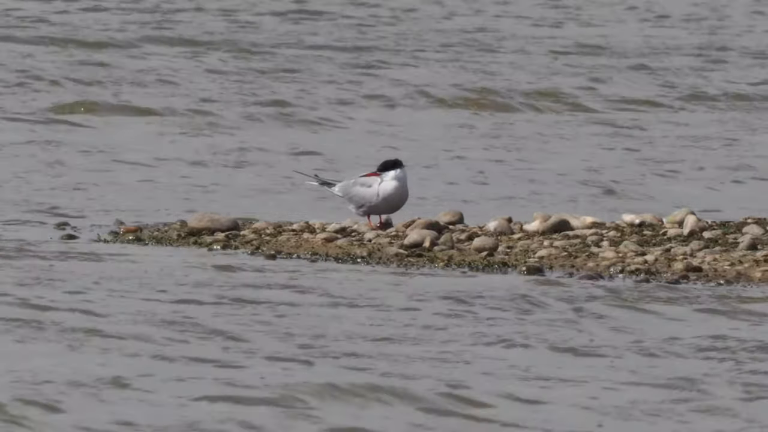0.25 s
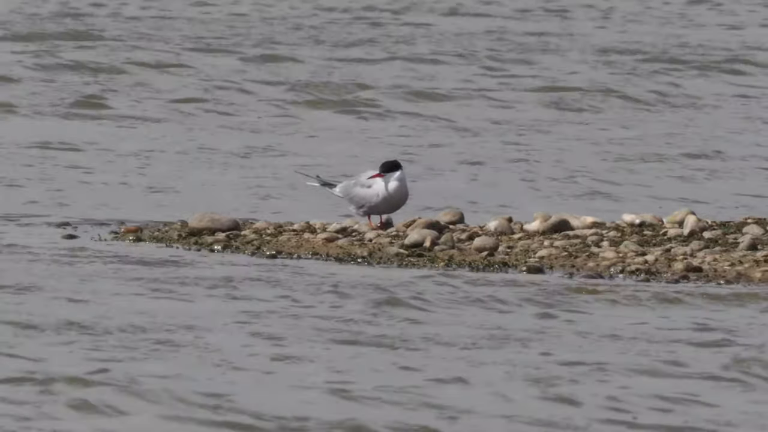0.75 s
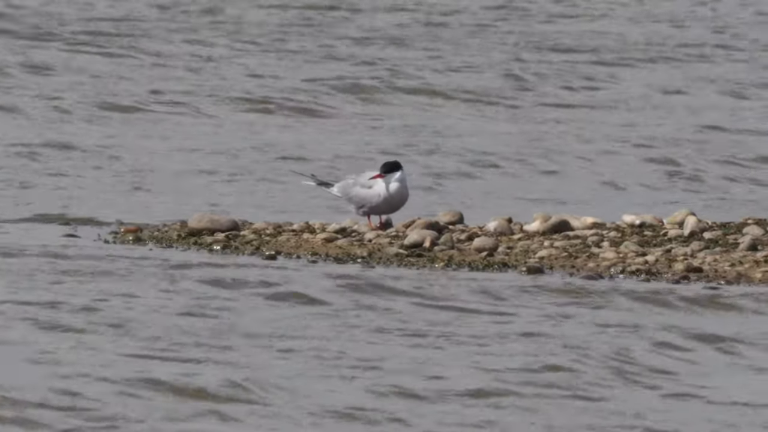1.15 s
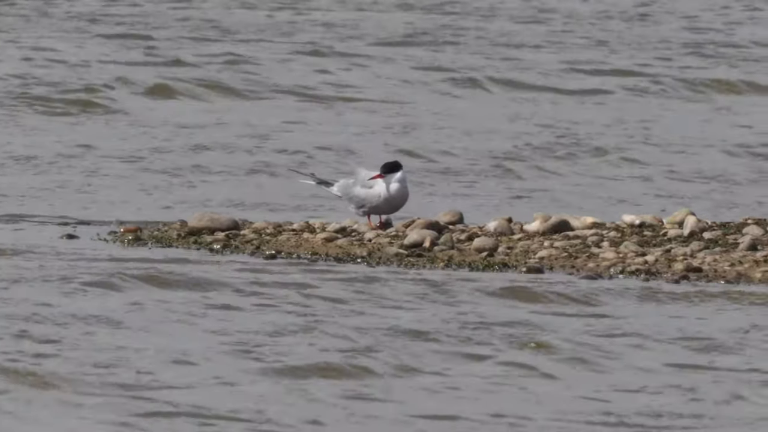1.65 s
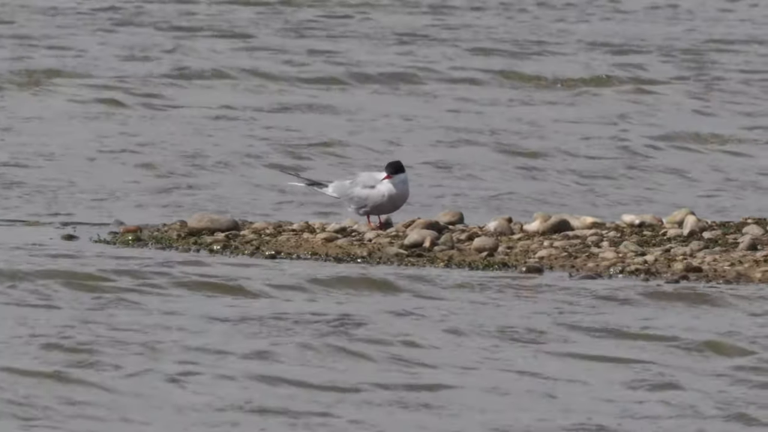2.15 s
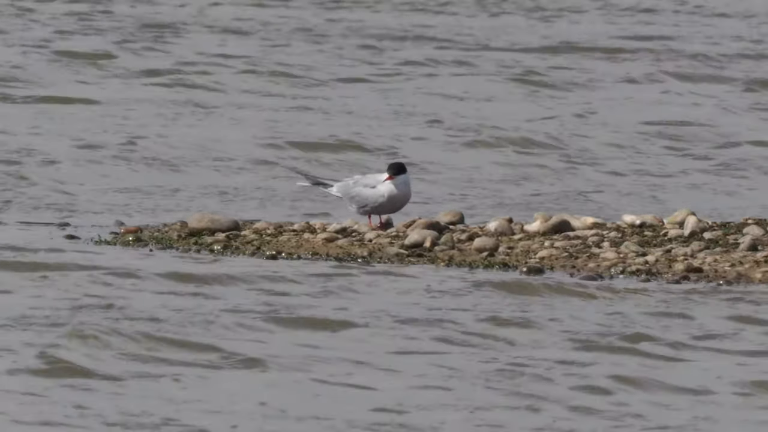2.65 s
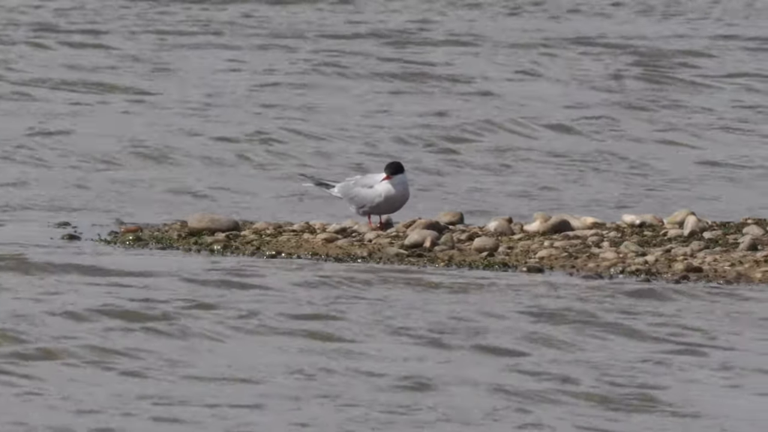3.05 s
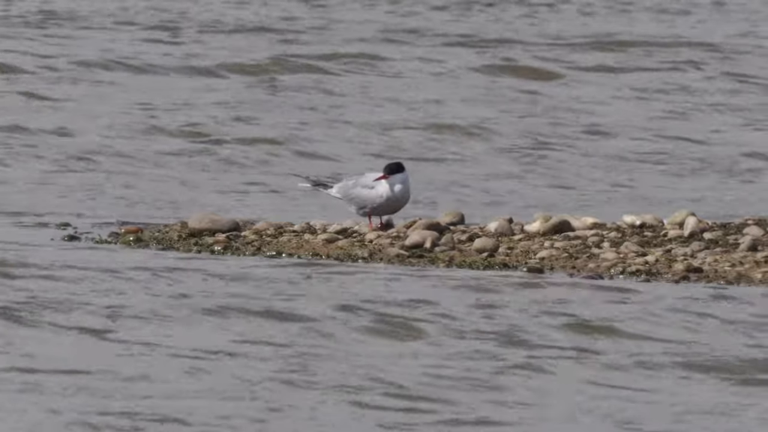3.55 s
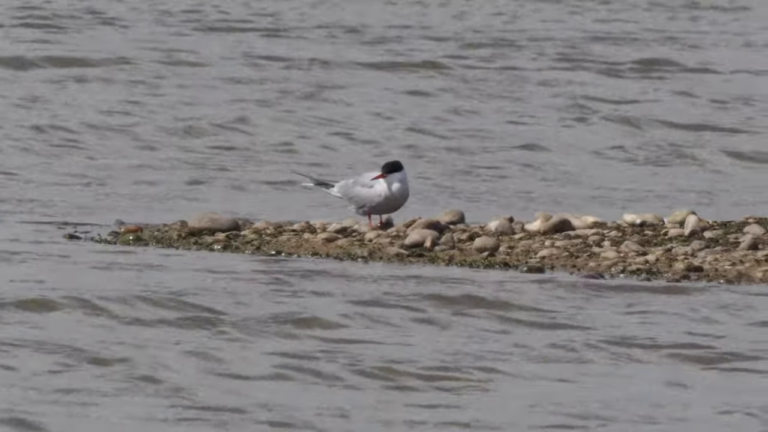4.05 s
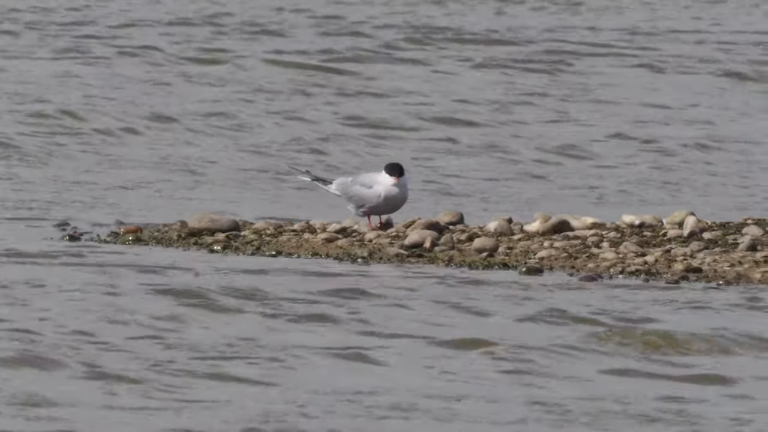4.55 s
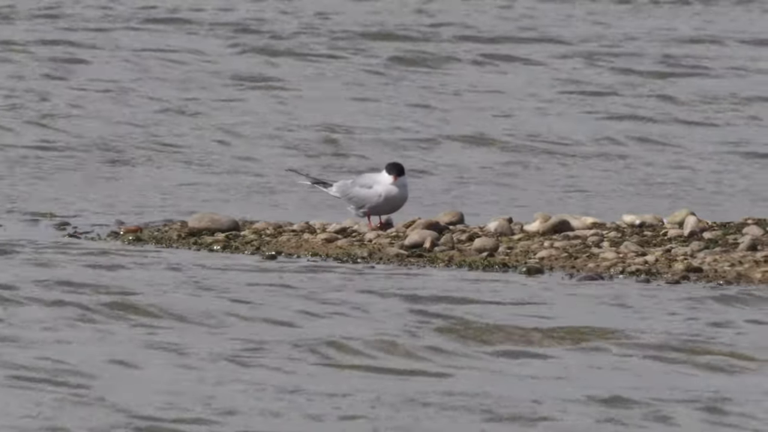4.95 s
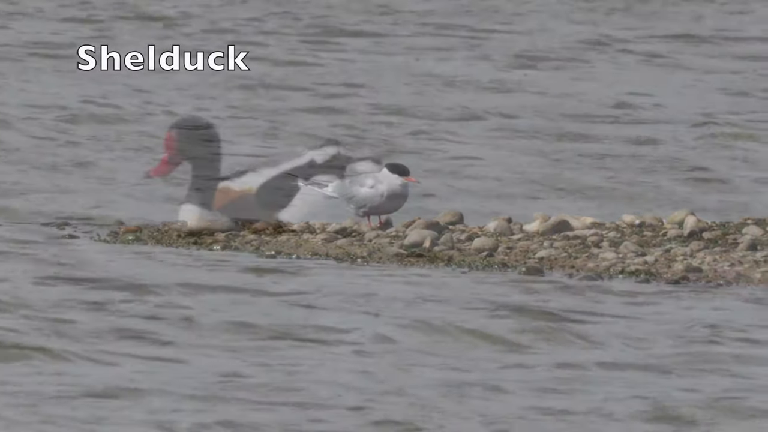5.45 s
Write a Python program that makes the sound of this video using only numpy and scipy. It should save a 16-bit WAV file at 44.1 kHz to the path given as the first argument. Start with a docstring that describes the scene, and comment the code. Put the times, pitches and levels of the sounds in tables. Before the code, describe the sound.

Spaced raspy tern whistles and faster rattling replies carry over soft wind and wavelets, ending in a throbbing, falling cry.

```python
"""Two terns over open water

One tern gives three harsh whistles, broken about 33 times a second, and a long, falling cry; the other answers
with a faster rattle, the second time over that cry. The whistles are near-pure tones that collapse into rasp
and squeak; the cry is a stack of throbbing harmonics. Filtered noise makes a faint echo from the shores and
a wash of wind, wavelets and microphone hiss; wavering sines make distant sounds: a blurred swell, then faint
gliding notes.
"""
import sys
import numpy as np
from scipy import signal
from scipy.fft import rfft, irfft
from scipy.io import wavfile
from scipy.ndimage import uniform_filter1d

SR = 44100
rng = np.random.default_rng(int(sys.argv[2]) if len(sys.argv) > 2 else 0)


def wrap_up_sound(samples):
    """Save the sound to the file named by the first command line argument, as 16-bit audio."""
    columns = np.atleast_2d(samples).T
    # keep every value between -1 and 1, then stretch to whole-number steps
    tamed = np.clip(columns, -1, 1)
    steps = np.round(tamed * 32767).astype(np.int16)
    wavfile.write(sys.argv[1], SR, steps)


N = 251370
TIME = np.arange(N) / SR

# rattles of the second tern, one list per call, level before the throat filter:
# start_s, pitch_hz, level_db
RATTLES = [
    [(0.797, 2904, -31.5), (0.828, 2860, -22.5), (0.86, 2754, -22), (0.945, 2702, -19),
     (0.972, 2619, -18.5), (1.015, 2625, -19.5), (1.065, 2678, -24.5), (1.092, 2534, -39)],
    [(4.86, 3094, -40), (4.885, 3020, -36.5), (4.96, 2692, -29.5), (5.005, 2667, -26.5),
     (5.03, 2553, -21.5), (5.115, 2580, -23), (5.143, 2670, -33.5), (5.175, 2520, -39)],
]
# quickening beat of each rattle: first_break_s, rate_breaks_per_s, rate_change_per_s2
RATTLE_BEATS = [(.8172, 39.83, 35), (4.8538, 42.47, 9.5)]


def undb(db):
    """Decibels to amplitude gain."""
    return 10 ** (np.asarray(db) / 20)


def curves(rows):
    """The columns of a table, joined by straight lines in time."""
    times_s, *columns = np.transpose(rows)
    return [np.interp(TIME, times_s, column) for column in columns]


def gate(start, end, edge):
    """One between two times, with straight ramps as edges (all in seconds)."""
    opening = np.clip((TIME - start) / edge + .5, 0, 1)
    closing = np.clip((end - TIME) / edge + .5, 0, 1)
    return opening * closing


def colour(x, points):
    """Filter by a spectrum of (Hz, dB) points, joined along a logarithmic frequency axis."""
    hz, db = np.transpose(points)
    bins_hz = np.maximum(np.fft.rfftfreq(N, 1 / SR), 1)
    gain_db = np.interp(np.log(bins_hz), np.log(hz), db)
    return irfft(rfft(x) * undb(gain_db), N)


def noise(lo_hz, hi_hz):
    """Band-passed white noise of rms 1."""
    band = signal.butter(4, [lo_hz, hi_hz], "band", fs=SR, output="sos")
    x = signal.sosfilt(band, rng.standard_normal(N))
    return x / x.std()


def waver(rate):
    """Smooth random curve of spread 1 that heads for a new value rate times a second."""
    hold = max(int(SR / rate), 1)
    steps = np.repeat(rng.standard_normal(N // hold + 1), hold)[:N]
    x = uniform_filter1d(steps, hold)
    return x / x.std()


def turn(hz):
    """Phase of an oscillator that follows a pitch."""
    return 2 * np.pi * np.cumsum(hz) / SR


def wash():
    """Wind and wavelets swell slowly under even hiss; a low rumble rises at the end. All is shaped noise."""
    # spectrum shape of wind, wavelets and hiss: frequency_hz, gain_db
    wash_spectrum = [(30, -53), (80, -46.5), (150, -26), (340, -13.5), (450, -16.5), (540, -7), (660, -7),
                     (780, 0), (1020, 0.5), (1350, -7), (2200, -16.5), (4500, -18), (10000, -17.5),
                     (15500, -12.5)]
    # slow swell of the water alone: time_s, level_db
    water_swell = [(0, -1), (0.7, 0), (1.4, -1.5), (2.0, 2), (2.5, -0.5), (3.2, 3), (3.8, 0), (4.7, -1.5),
                   (5.2, -1), (5.7, -3.5)]
    # rms level of the rumble: time_s, level_db
    rumble_level = [(0, -110), (5.1, -91), (5.35, -71.5), (5.63, -67), (5.67, -57.5), (5.7, -68)]
    bed = colour(rng.standard_normal(N), wash_spectrum)
    bed *= undb(-54.5) / bed.std()
    water = colour(bed, [(1500, -0.5), (3500, -37.0)])
    rumble_spectrum = [(25, -24), (90, -23), (220, -11), (380, -3.5), (600, 1.5), (1000, -22.5), (4000, -65.0)]
    rumble = colour(rng.standard_normal(N), rumble_spectrum)
    swell = undb(curves(water_swell)[0] + 1.0 * waver(11))
    # adding swell - 1 moves the water and leaves the hiss even
    return bed + (swell - 1) * water + undb(curves(rumble_level)[0]) * rumble / rumble.std()


def distant_sounds():
    """Distant sounds: one blurred swell near 1.2 kHz, then faint gliding notes, all from wavering sines."""
    # the swell, then the notes: start_s, length_s, first_pitch_hz, last_pitch_hz, level_db, waver_share_of_pitch
    distant = [(0.538, 0.45, 1177, 1222, -56, .06), (3.741, 0.24, 3450, 3460, -72, .028),
               (4.431, 0.18, 3350, 3430, -68, .028), (5.485, 0.0464, 2066, 1790, -67.5, .028),
               (5.654, 0.046, 2110, 1810, -65, .028)]
    out = 0
    for start, length, first_hz, last_hz, db, unsteady in distant:
        glide_hz = np.interp(TIME, [start, start + length], [first_hz, last_hz])
        sine = np.sin(turn(glide_hz * (1 + unsteady * waver(250))))
        out = out + gate(start, start + length, edge=length / 3) * undb(db + 3.0 * waver(50)) * sine
    return out


def shore(x, delay=0.0092):
    """Scatter from the near bank dies fast; the far shore lingers faintly; moving water blurs both."""
    after = np.maximum(TIME - delay, 0)
    echo = 0
    # near bank, then far shore: level dB, seconds to decay by 60 dB, depth of the level ripple
    for db, t60, ripple in ((-9.0, 0.2, 0.68), (-34.5, 1.15, 0.56)):
        tail = rng.standard_normal(N) * (after > 0) * np.exp(-np.log(1000) * after / t60)
        tail = tail / np.linalg.norm(tail)
        rippled = x * (1 + ripple * waver(250))
        echo = echo + undb(db) * signal.fftconvolve(rippled, tail)[:N]
    return colour(echo, [(1000, -2.0), (2000, -2), (2700, -2.0), (3700, 2.5), (5000, -4), (9000, -9)])


def breaks(calls, beats, half_width, dip_db):
    """The whistle collapses at a changing rate: break shape (0-1), dip in dB, squeak size, pitch sag."""
    dip_scatter_db, squeak_scatter_db = 3.5, 5  # from one break to the next
    broken, dips, squeak, sag = np.zeros((4, N))
    for call, (first, rate, change) in zip(calls, beats):
        near = slice(int(call[0][0] * SR), int(call[-1][0] * SR))
        since = TIME[near] - first
        beat = rate * since + change * since ** 2 / 2
        nearest = np.maximum(np.round(beat), 0).astype(int)
        # distance from the nearest break, in half widths
        away = (beat - nearest) / (rate + change * since) / half_width
        shape = np.exp(-away ** 4)
        dip_chance, squeak_chance = rng.standard_normal(size=(32, 2))[nearest].T
        broken[near] = shape
        dips[near] = (dip_db + dip_scatter_db * dip_chance) * shape
        squeak[near] = undb(squeak_scatter_db * squeak_chance) * shape
        sag[near] = away * np.exp(-(away / 2) ** 2)
    return broken, dips, squeak, sag


def whistle(calls, beats, splits, half_width, break_db, leap_hz, scoop_hz, rasp_db, air_db, squeak_db,
            upper_db, third_db, jitter):
    """A near-pure tone that collapses again and again into a rasp and an arching squeak."""
    hz, db, octave_db = curves(np.vstack(calls))
    on = sum(gate(call[0][0], call[-1][0], edge=0.0012) for call in calls)
    broken, dip_db, squeak, sag = breaks(calls, beats, half_width, break_db)
    # the pitch leaps up around each break and turns unsteady inside it
    leap = uniform_filter1d(broken, size=360)
    jittered_hz = hz * (1 + jitter * waver(250))
    phase = turn(jittered_hz + scoop_hz * sag + leap_hz * leap + 170 * broken * waver(1300))

    # the slower mode pushes the membranes: side tones, steadiest where it locks at half the pitch
    slip = turn(110 * waver(700))
    push = 0
    for start, end, share, depth_db in splits:
        joined = sum(gate(call[0][0] + start, call[0][0] + end, edge=.008) for call in calls)
        push = push + undb(depth_db) * joined * np.cos(share * phase + 4 * (.63 - share) * slip)

    fundamental = (1 + push) * np.sin(phase + .5 * push)
    octave = undb(octave_db - 6.1 * broken) * np.sin(2 * phase + 2 * push)
    third = undb(third_db) * np.sin(3 * phase)
    tone = (fundamental + octave + third) * undb(dip_db + 0.48 * waver(130))
    rasp = undb(rasp_db) * broken * noise(1730, 3495)
    air = undb(air_db) * noise(2000, 3100)
    upper_air = undb(upper_db + 2.5 * waver(220)) * noise(4300, 4950)
    # the squeak keeps its strength however loud the tone is
    squeal = undb(squeak_db) * squeak * np.sin(turn(3850 + 750 * broken + 130 * waver(700)))
    voice = undb(db) * (np.sqrt(2) * tone + rasp + air + upper_air)
    return on * (voice + np.sqrt(2) * squeal)


def hoarse_starts():
    """The second tern's voice scrapes as its calls begin: three unsteady partials and a band of noise."""
    # hoarse stretches: start_s, end_s, level_db (common gain of partials and noise)
    hoarse = [(0.776, 0.825, -52.5), (4.836, 4.855, -53), (4.857, 4.97, -36)]
    scrape = 0
    for hz, spread_hz, part_db in [(2310, 100, 2.0), (2970, 320, 3.5), (4880, 170, -6)]:
        partial = np.sin(turn(hz + spread_hz * waver(900)))
        scrape = scrape + undb(part_db + 2.5 * waver(200)) * partial
    dip_db = breaks(RATTLES, RATTLE_BEATS, half_width=0.0032, dip_db=-8.5)[1]
    size = sum(undb(db) * gate(start, end, edge=0.003) for start, end, db in hoarse)
    return size * undb(dip_db) * (scrape + undb(-3.5) * noise(2000, 3900))


def rattles():
    """The second tern's breaks are deep and fast, and quicken; each pulse starts low and ends high."""
    # slower mode of the syrinx at each start: from_s, to_s (into the call), share_of_pitch, depth_db
    splits = [(0.0023, .015, .19, -8.5)]
    octave_db = -27.5  # re the tone
    calls = [[(s, hz, db, octave_db) for s, hz, db in call] for call in RATTLES]
    return whistle(calls, RATTLE_BEATS, splits, half_width=.0042, break_db=-18.5, leap_hz=130.1,
                   scoop_hz=-63.5, rasp_db=-24, air_db=-28.5, squeak_db=-45, upper_db=-29.5,
                   third_db=-53, jitter=.007)


def cry(tremor_hz=34, first_dip=4.957, sag=0.079, throb_db=-3, flutter_db=2.5):
    """A lower, full voice whose pitch drops for a moment with each throb, then falls away in a rasp."""
    # the long cry, before its colouring: time_s, pitch_hz, harmonic_1_db, harmonic_2_db, harmonic_3_db
    glide = [(4.93, 1637, -49, -50, -67), (4.944, 1812, -33, -25.5, -35), (4.98, 1873, -34.5, -35.5, -41),
             (4.994, 1891, -39, -21.5, -43), (5.038, 1893, -29.5, -39, -53),
             (5.058, 1877, -28.5, -26, -44.5), (5.13, 1900, -30.5, -28, -39.5),
             (5.162, 1834, -34.5, -30.5, -45), (5.18, 1702, -30.5, -26.5, -48),
             (5.206, 1370, -33.5, -27.5, -29), (5.268, 1062, -52, -42, -54)]
    # brief dips in level as the cry falls: time_s, half_width_s, dip_db
    catches = [(5.198, 0.0032, -22), (5.229, 0.0036, -12)]
    # rough until it settles, clean while held, and rougher the further it falls
    start_rough, settle_s, held_rough, fall_rough = 0.62, 0.0054, .04, .3
    start, end = glide[0][0], glide[-1][0]
    hz, *harmonic_db = curves(glide)
    unsettled = np.exp(-np.maximum(TIME - start, 0) / settle_s)
    rough = held_rough + start_rough * unsettled + fall_rough * (1 - hz / hz.max())
    # only the crests of the tremor make a throb
    throb = np.clip(2.2 * np.cos(2 * np.pi * tremor_hz * (TIME - first_dip)) - 1.3, 0, 1)
    catch_db = sum(db * np.exp(-((TIME - s) / width) ** 2) for s, width, db in catches)
    phase = turn(hz * (1 - sag * throb + .016 * rough * waver(700)))

    # the fourth harmonic comes out as it slides under the throat's upper edge
    fourth_db = harmonic_db[2] + np.interp(4 * hz, [5700, 6100], [-4, -25])
    fifth_db = harmonic_db[2] - 32
    voice = 0
    for k, db in enumerate([*harmonic_db, fourth_db, fifth_db], 1):
        # roughness spreads each harmonic into a skirt, mostly on its lower side
        skirt = rough * (signal.hilbert(noise(30, 225)) * np.exp(-1j * k * phase)).real
        level = undb(db + throb_db * throb + flutter_db * waver(150))
        voice = voice + level * (np.sin(k * phase) + skirt)

    breath = undb(-13) * noise(1810, 2500) + undb(-20.5) * noise(2140, 3700) + undb(-22.5) * noise(4500, 5400)
    air = undb(harmonic_db[1]) * breath
    return gate(start, end, edge=0.0067) * undb(catch_db) * (np.sqrt(2) * voice + air)


def harsh_whistles():
    """The first tern repeats one gesture: a sagging tone whose breaks slow down through the call."""
    # calls, level before gain and throat filter:
    # start_s, length_s, pitch_shift_hz, level_db, swell_db_per_s, octave_shift_db
    whistle_calls = [(0.07, .32, 8, -19.6, 0, 0), (1.516, 0.32, -4, -20.5, 18.5, 1),
                     (2.921, 0.32, 4.5, -21, -5.5, 2)]
    # shared gesture, its times stretched to each call's length:
    # into_call_s, pitch_hz, level_db (re the call), octave_db (re the tone)
    gesture = [(0, 2993, -10, -19.5), (.024, 3042, 0, -21.5), (0.066, 2830, -2, -25),
               (.15, 2651, -.5, -24.5), (.24, 2578, 1, -21), (0.296, 2735, -4, -25),
               (.325, 2573, -9, -21.5)]
    # where a slower mode of the syrinx joins: from_s, to_s (into the call), share_of_pitch, depth_db
    splits = [(0, 0.053, .31, -15), (0.171, 0.263, .5, -16.5)]
    # slowing beat: first_break_s (into the call), rate_breaks_per_s, rate_change_per_s2
    slowing_beat = (.0236, 34.25, -13.4)
    into, hz, db, octave_db = np.transpose(gesture)
    first_break, rate, change = slowing_beat
    calls, beats = [], []
    for start, length, shift_hz, level_db, swell, octave_shift_db in whistle_calls:
        since = into * length / into[-1]
        call_db = db + level_db + swell * (since - length / 2)
        calls.append(np.column_stack([start + since, hz + shift_hz, call_db, octave_db + octave_shift_db]))
        beats.append((start + first_break, rate, change))
    return whistle(calls, beats, splits, half_width=.0044, break_db=-9.5, leap_hz=99.46, scoop_hz=-20,
                   rasp_db=-12, air_db=-27.5, squeak_db=-41.0, upper_db=-38.5, third_db=-45, jitter=.009)


def scene():
    """Both terns, their echo, the distant sounds and the wash around them."""
    # the throat passes little below 1.8 kHz and has a notch near 7 kHz
    throat = [(700, -43.5), (1330, -16.0), (1630, -17.0), (2000, 1.5), (3100, -1), (3950, -2.5),
              (4600, -2.5), (6600, 1.5), (7050, -18.5), (8400, -3)]
    cry_throat = [(600, -35), (1050, -11), (1350, 1), (3700, 2), (5600, 0.5), (6500, 2), (7600, 4.5)]
    whistled = colour(undb(1.16) * harsh_whistles() + rattles(), throat)
    terns = whistled + hoarse_starts() + colour(cry(), cry_throat)
    return (terns + shore(terns) + distant_sounds() + wash())[None]


def record(dry):
    """The recorder cuts the top: a steep low-pass at 15.75 kHz."""
    return signal.sosfilt(signal.ellip(12, .1, 80, 15750, fs=SR, output="sos"), dry)


dry = scene()
out = record(dry)
wrap_up_sound(out)
```